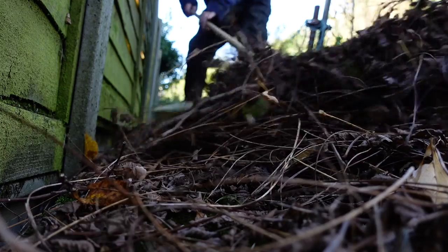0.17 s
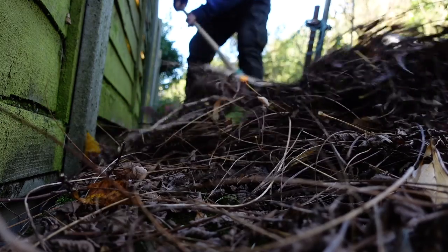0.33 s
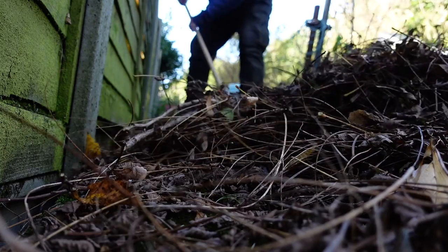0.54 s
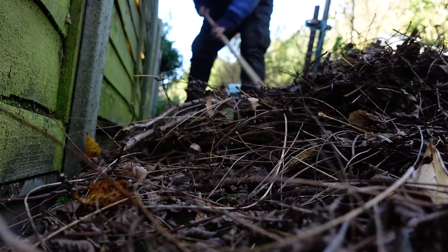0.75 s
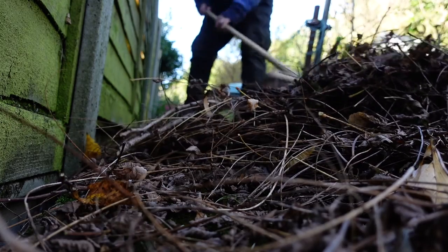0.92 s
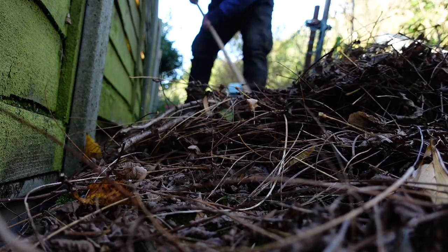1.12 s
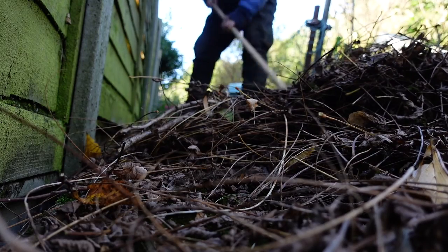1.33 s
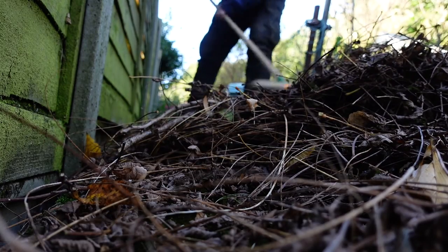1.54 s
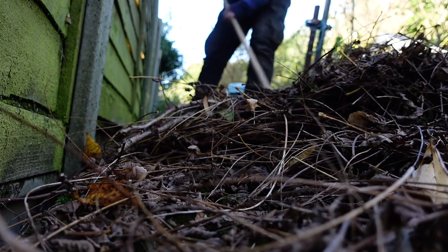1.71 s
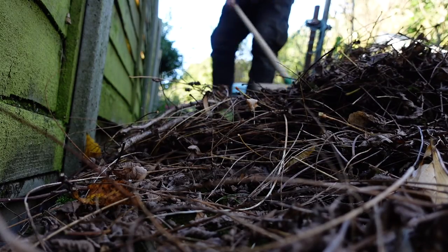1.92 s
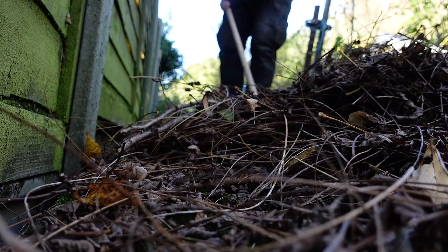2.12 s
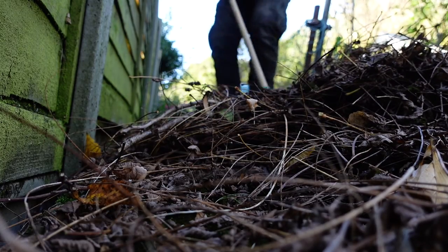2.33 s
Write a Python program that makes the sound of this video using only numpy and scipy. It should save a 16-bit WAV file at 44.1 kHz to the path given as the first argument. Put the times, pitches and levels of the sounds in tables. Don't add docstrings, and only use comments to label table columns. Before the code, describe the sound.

A stiff broom sweeps dry leaves and twigs beside a wooden fence, bright hissing strokes with crunching litter, wooden knocks between them, lighter flicks at the end, heard from a few metres over faint outdoor air.

```python
import sys
import numpy as np
from scipy import signal
from scipy.io import wavfile

SR = 44100
rng = np.random.default_rng(int(sys.argv[2]) if len(sys.argv) > 2 else 0)


def boost(x):
    u = np.asarray(x, float) / 20
    return 10 ** u


def put_to_file(sound):
    columns = np.atleast_2d(sound).T
    safe = np.clip(columns, -1, 1)
    whole_steps = np.round(safe * 32767)
    wavfile.write(sys.argv[1], SR, whole_steps.astype(np.int16))


N = 108530
FLICKS_PER_S, CRUNCHES_PER_S = 9000, 2500


def rms_one(x):
    return x / np.sqrt(np.mean(x ** 2) + 1e-20)


def at_hz(points, hz):
    table = np.array(points)
    return np.interp(np.log(hz), np.log(table[:, 0]), table[:, 1])


def band_pass(x, low, high, order=2):
    return signal.sosfilt(signal.butter(order, [low, high], "band", fs=SR, output="sos"), x)


def high_pass(x, hz, order):
    return signal.sosfilt(signal.butter(order, hz, "high", fs=SR, output="sos"), x)


def add_at(out, s, sound):
    start = int(s * SR)
    out[start:start + len(sound)] += sound


def drift(rate):
    r = np.exp(-32 * np.pi * rate / SR)
    noise = rng.standard_normal(N // 16 + 2002)
    slow = signal.lfilter([1], [1, -2 * r, r * r], noise)[2000:]
    return np.interp(np.arange(N) / 16, np.arange(len(slow)), rms_one(slow))


def grains(per_s, spread_db):
    sizes = boost(spread_db * np.minimum(rng.exponential(1, (4, N)), 5))
    sizes = sizes * rng.choice([-1, 1], (4, N))
    hits = rng.random((4, N)) < per_s / SR
    return rms_one(sizes * hits).reshape(2, 2, N)


# frequency in Hz, likeness from 0 to 1.
LIKENESS = [(100, 0.94), (500, 0.9), (1000, 0.87), (2000, 0.89), (4000, 0.9), (8000, 0.8), (12000, 0.7)]
# frequency in Hz, left minus right in dB.
LEAN = [(300, 0), (600, -.9), (1200, -2.2), (2400, -.6), (4500, -2.2), (8500, -.9), (14000, 1.2)]
PIVOT_HZ = 4870
BELOW_SHARE = 0.16


def banded(source, spectrum, patchy_db, tilt=0):
    out, plain_power = 0, 0
    edges = 30 * 2 ** np.arange(0, 9.2, 1 / 3)
    for k, (low, high) in enumerate(zip(edges, edges[1:])):
        hz = np.sqrt(low * high)
        if not spectrum[0][0] * .7 < hz < spectrum[-1][0] * 1.3:
            continue
        mid, side = band_pass(source[k % 2], low, min(high, .45 * SR))
        alike = np.clip(at_hz(LIKENESS, hz), 0, 1)
        lean = at_hz(LEAN, hz) / 2
        pair = np.sqrt(1 + alike) * mid + np.sqrt(1 - alike) * side * [[1], [-1]]
        pair = pair * boost([[lean], [-lean]])
        pair = pair * boost(at_hz(spectrum, hz) + patchy_db * drift(9.7))
        plain_power = plain_power + np.mean(pair ** 2)
        octaves = np.log2(hz / PIVOT_HZ)
        out = out + pair * boost(tilt * max(2 * octaves, -BELOW_SHARE * octaves))
    return out / np.sqrt(plain_power)


# time in seconds, bristle pressure as hiss in dB, speed as
# brightness in dB per half octave above the pivot, load of litter in dB.
STROKES = [
    [(0, -21.5, 1.5, 1), (.12, -25, 2, 1.5), (.17, -27.5, 0, -3.5), (.45, -26.5, 0, -1),
     (.53, -29, -1, -1.5), (.62, -36.5, -0.5, 1)],
    [(.67, -35.5, 1, 3), (.74, -25.5, 1, 4), (.80, -22.5, 0.5, 0), (.89, -22, -3.5, 0), (.95, -27, -4, 1),
     (1.01, -34.5, -2.5, -1), (1.24, -40, -3.5, -3)],
    [(1.285, -41, 0, 3.5), (1.315, -36, -0.5, 7.5), (1.345, -27, 2, 4), (1.39, -22.5, 1, 3.5),
     (1.44, -22, -2, -2.5), (1.475, -36, 0.5, 2), (1.51, -38.5, -3, -0.5), (1.61, -45, -4.5, 0),
     (1.735, -51, -3, -1)],
]
# time in seconds, hiss in dB, brightness in dB per half
# octave above the # pivot, load in dB.
LAST_STROKES = [
    [(1.76, -37.5, 1, 5), (1.79, -33.5, 0, 5), (1.83, -23, 0.5, 2), (1.89, -22.5, -3.5, -0.5),
     (1.915, -33, -1, 1.5), (1.99, -42.5, 1.5, 6.5), (2.04, -44, -2, 0), (2.11, -45.5, -2.5, 9),
     (2.18, -57, 0, 15.5)],
    [(2.2, -35, -1, -1), (2.23, -38.5, 2, 7.5), (2.29, -36.5, 1, 4), (2.33, -42, 2, 6),
     (2.355, -51.5, -2, 6), (2.46, -56, -2, 6)],
]
# frequency in Hz, level in dB per Hz.
HISS = [(1000, -29), (2200, -6), (3000, -4.5), (4000, -1), (5000, -1.5), (7000, -3), (10000, -9),
        (15500, -23)]
# frequency in Hz, level in dB per Hz.
LITTER = [(200, -8), (500, -5), (900, 1.5), (1400, 1.5), (2200, -6), (3200, -9.5), (5000, -18)]


def sweeping():
    s, *columns = np.transpose(np.concatenate(STROKES + LAST_STROKES))
    level_db, speed, load_db = [np.interp(np.arange(N) / SR, s, c) for c in columns]
    level_db = level_db + 0.6 * drift(76)
    hiss = banded(grains(FLICKS_PER_S, spread_db=0.0), HISS, patchy_db=1.05, tilt=speed)
    crunch = banded(grains(CRUNCHES_PER_S, spread_db=1.0), LITTER, patchy_db=1.0)
    return boost(level_db) * (boost(2.5) * hiss + boost(load_db - 6.5) * crunch)


def leaf_grain(fine, hz, width):
    width = min(width, .6)
    mid, side = band_pass(fine, hz * (1 - width), hz * (1 + width))
    return rms_one(mid) + 0.23 * rms_one(side) * [[1], [-1]]


# start in seconds, length in seconds, level in dB rms,
# pitch in Hz, width as share of pitch.
RUSTLES = [
    (1.918, 0.036, -27.5, 5760, .13),
    (1.944, 0.045, -33.5, 7600, 0.31),
    (2.0455, 0.003, -32, 6600, 0.42),
    (2.054, 0.023, -37.5, 6000, .3),
]


def skids():
    out, t = 0, np.arange(N) / SR
    fine = grains(FLICKS_PER_S, spread_db=2.5)
    edge_s = 0.002
    for k, (s, length, db, hz, width) in enumerate(RUSTLES):
        along = np.clip((t - s) / length, 0, 1)
        start = np.clip((t - s) / edge_s, 0, 1)
        stop = np.clip((s + length - t) / edge_s / 6 + 1, 0, 1)
        shape = boost(-3.9 * along) * start * stop
        out = out + boost(db) * shape * leaf_grain(fine[k % 2], hz, width)
    return out


# start in seconds, length in
# seconds, level in dB rms, pitch in Hz, width as share of pitch.
SLIDES = [
    (0.807, .12, -25.5, 4750, 0.15),
    (1.38, .085, -22.5, 4800, 0.19),
    (2.07, 0.11, -42.5, 3600, 0.26),
    (0, 0.56, -32.5, 7100, .2),
    (0.724, .13, -32, 960, 0.33),
    (1.315, .12, -31, 860, .25),
          (2.3, .3, -47, 3200, .18),
]


def slides():
    out, t = 0, np.arange(N) / SR
    fine = grains(FLICKS_PER_S, spread_db=2.5)
    for k, (s, length, db, hz, width) in enumerate(SLIDES):
        along = np.clip((t - s) / length, 0, 1)
        out = out + boost(db) * np.sin(np.pi * along) * leaf_grain(fine[k % 2], hz, width)
    return out


def ring(clicks, hz, t60):
    r, w = boost(-60 / (t60 * SR)), 2 * np.pi * hz / SR
    return signal.lfilter([0, np.sin(w)], [1, -2 * r * np.cos(w), r * r], clicks + 1e-18)


# start in seconds, length of the clatter in seconds, level in dB.
KNOCKS = [
    (1.2446, 0.028, -23.5),
    (1.7402, 0.009, -19),
    (2.188, 0.0105, -20.5),
]
# frequency in Hz, level in dB, t60 in seconds.
HEAD = [(600, -8, 0.027), (1200, 1.5, 0.0072), (2030, -14, 0.022), (2900, -3.5, 0.0046), (3630, 2.5, 0.008),
        (3960, -0.5, 0.0079), (4990, -5.5, 0.017), (6100, 0.5, 0.0055), (6880, -3.5, 0.0062),
        (9800, -4.5, 0.0027), (12100, -24, .003)]


def head_clatter():
    out = np.zeros(N)
    contacts, contacts_per_s = 80, 2500
    for s, length, db in KNOCKS:
        when = (np.arange(contacts) + rng.uniform(0, 1, contacts)) / contacts_per_s
        shape = (when < length) * np.minimum(when / 0.0026 + 0.26, 1)
        shape = shape * (1 - .5 * np.clip(when / length, 0, 1))
        for hz, mode_db, t60 in HEAD:
            clicks = np.zeros(N)
            clicks[((s + when) * SR).astype(int)] = shape * rng.normal(0, 1, contacts)
            body = ring(clicks, hz, t60)
            out += boost(db + mode_db) * body / np.abs(body).max()
    return out


def crushed_litter():
    out, t = np.zeros(N), np.arange(4000) / SR
    for s, length, db in KNOCKS:
        rise = np.minimum(t / 0.00054, 1)
        fall = np.exp(-np.maximum(t - 0.9 * length, 0) / 0.0059)
        burst = rise * fall * rng.standard_normal(len(t))
        add_at(out, s, boost(db) * band_pass(burst, 500, 3060, order=1))
    return out


def struck(rows, rise_s):
    out, t = np.zeros(N + 4000), np.arange(4000) / SR
    for s, db, hz, t60 in rows:
        envelope = boost(db + 4 - 60 * t / t60) * (1 - np.exp(-t / rise_s))
        add_at(out, s, envelope * np.sin(2 * np.pi * hz * t))
    return out[:N]


# start in seconds, peak in dB, pitch in Hz, ring in cycles.
THUMPS = [
    (1.249, -26, 198, 4.6),
    (1.7435, -15.5, 198, 4.1),
    (1.7518, -16, 135, 2.6),
    (2.1911, -15, 222, 9),
]


def thumps():
    return struck([(s, db, hz, cycles / hz) for s, db, hz, cycles in THUMPS], rise_s=0.0011)


# start in seconds, peak in dB, pitch in Hz.
TAPS = [(1.2460, -18, 3680), (1.2468, -18, 845), (1.2535, -18, 4300), (1.2558, -13.5, 940),
        (1.2562, -17, 1880), (1.2565, -18, 3450), (1.2655, -19, 1070), (1.2715, -30, 1200),
        (1.2995, -18, 1010), (1.7407, -13, 3700), (1.7418, -14, 1200), (1.7435, -18, 2900),
        (1.7439, -19, 610), (1.7440, -17, 2250), (1.7465, -21, 1100), (1.7520, -30, 3750),
        (2.1885, -12, 1244), (2.1893, -11.5, 3660), (2.1894, -10, 4050), (2.1935, -13, 2700),
        (2.1940, -15, 1510), (2.1950, -19, 3300), (2.1955, -19, 4200)]


def taps():
    rows = [(s, db, hz, 0.012 * (hz / 2000) ** 0.085) for s, db, hz in TAPS]
    return struck(rows, rise_s=0.0017)


def pops(rows, cycles, ratios):
    out, t = np.zeros(N + 4000), np.arange(4000) / SR
    for (s, db, hz), phases in zip(rows, rng.uniform(0, 1, (len(rows), 4))):
        for (ratio, share_db), phase in zip(ratios, phases):
            f = min(hz * ratio, .4 * SR)
            rise = (1 - np.exp(-t * f * 3.6)) ** 2
            decay = boost(-60 * t * f / cycles / ratio ** .5)
            body = np.sin(2 * np.pi * (f * t + phase)) * rise * decay
            add_at(out, s, boost(db + share_db + 9) * body)
    return out[:N]


# start in seconds, peak in dB, pitch in Hz.
CLODS = [(.618, -26, 1200), (.632, -38, 900), (.645, -29, 1000), (1.762, -34, 516), (1.7645, -33, 700),
         (1.772, -27, 570), (1.7745, -31.5, 613), (1.777, -33, 890), (1.784, -36, 800), (1.912, -27, 400),
         (1.9136, -28, 1200), (1.916, -35, 500), (1.919, -33, 400), (1.9235, -28, 1000), (1.929, -28, 950),
         (1.9375, -34, 450), (1.9449, -21.5, 970), (1.9465, -33, 1200), (1.948, -22.5, 560),
         (1.953, -30, 450), (1.960, -31, 1100), (1.9635, -31, 600), (1.9666, -27, 900), (1.971, -29, 940),
         (1.974, -31, 850), (1.977, -35, 690), (1.982, -42, 302), (2.0965, -35, 252), (2.103, -39, 800),
         (2.1058, -36, 300), (2.1097, -35, 850), (2.1145, -37, 1100), (2.125, -37, 300), (2.217, -33, 600),
         (2.328, -42, 950), (2.383, -44, 950)]


def clods():
    return pops(CLODS, 6.0, [(1.01, 6), (1.6, -3), (2.6, -18)])


# start in seconds, length in seconds, peak in dB, first Hz, last Hz.
ROLLS = [
    (1.9233, 0.0124, -15.5, 540, 338),
    (2.097, .019, -33, 260, 750),
]


def rolls():
    out, t = 0, np.arange(N) / SR
    for s, length, db, first_hz, last_hz in ROLLS:
        along = np.clip((t - s) / length, 0, 1)
        pitch_hz = (along > 0) * first_hz * (last_hz / first_hz) ** along
        turns = np.cumsum(pitch_hz) / SR
        out = out + boost(db) * np.sin(np.pi * along) ** 1.4 * np.sin(2 * np.pi * turns)
    return out


# start in seconds, peak in dB, pitch in Hz.
SNAPS = [(.126, -18, 10000), (.128, -26, 5000), (.141, -21, 6730), (1.627, -50, 7500), (1.68, -60, 13000),
         (1.996, -42, 3520), (2.0465, -37, 3960), (2.049, -35, 7500), (2.062, -39, 6800),
         (2.0675, -38, 6500), (2.0725, -39, 4970), (2.077, -40, 5200), (2.093, -42, 4100),
         (2.114, -45, 4000), (2.1395, -43, 3900), (2.397, -47.5, 4200), (2.416, -48, 3650)]


def snaps():
    return pops(SNAPS, 20, [(1.05, 8.0), (0.73, -9.0), (1.37, -8), (0.28, -12)])


# lag in seconds, level in dB.
FENCE = [(.0045, -27), (.011, -18.5), (0.017, -29)]


def fence(x):
    out, dull = np.zeros((2, N)), signal.lfilter([.55], [1, -.45], x)
    for lag, db in FENCE:
        for side, stretch in enumerate((1, 1.13)):
            d = int(lag * stretch * SR)
            out[side, d:] += boost(db) * dull[:N - d]
    return out


# frequency in Hz, level in dB per Hz.
AIR = [(45, -18), (110, -10), (170, -6.5), (380, -14), (900, -15), (2000, -37), (3000, -32), (4500, -32),
       (15500, -45)]


def outdoor_air():
    return boost(-43) * banded(rng.standard_normal((2, 2, N)), AIR, patchy_db=1.8)


# frequency in Hz, wander in Hz, level in dB rms.
DRONE = [(100.5, 3.66, -47), (129.9, 1.9, -44), (198, 2.68, -49), (225.3, 4.76, -52), (289, 2.96, -51.5),
         (338, 4.96, -52.5)]


def drone():
    out = np.zeros(N)
    for hz, wander, db in DRONE:
        level = boost(db + 1.5 + 1.95 * drift(8.4))
        turns = np.cumsum(hz + wander * drift(9.6)) / SR
        out += level * np.sin(2 * np.pi * turns)
    return out


def scene():
    blows = head_clatter() + crushed_litter() + thumps() + taps()
    blows = blows + clods() + rolls() + snaps()
    return sweeping() + skids() + slides() + blows + fence(blows) + outdoor_air() + drone()


def band_limit(x):
    return signal.sosfilt(signal.butter(12, 16310, fs=SR, output="sos"), x)


def record(dry):
    side = high_pass(dry[0] - dry[1], 410, order=2) / 2
    x = high_pass(dry.mean(axis=0) + side * [[1], [-1]], 45, order=4)
    x = signal.sosfilt(signal.cheby2(12, 60, 16350, fs=SR, output="sos"), x)
    return band_limit(x)


dry = scene()
out = record(dry)
put_to_file(out)
```